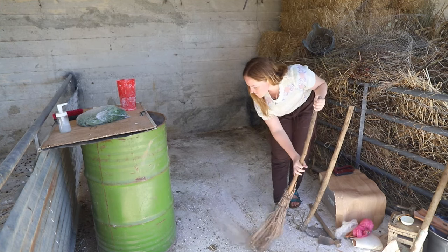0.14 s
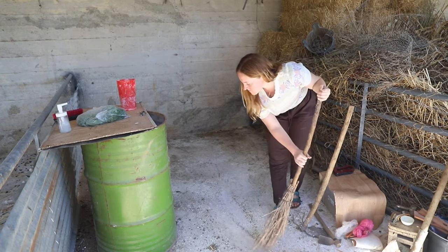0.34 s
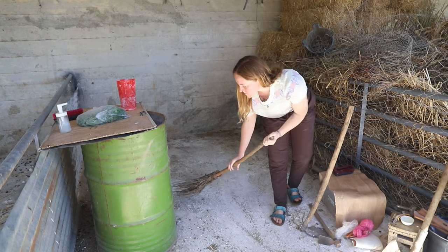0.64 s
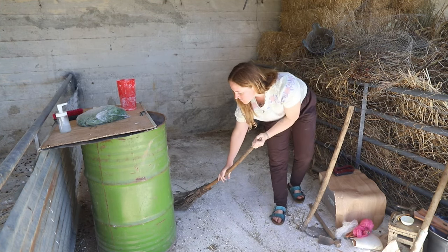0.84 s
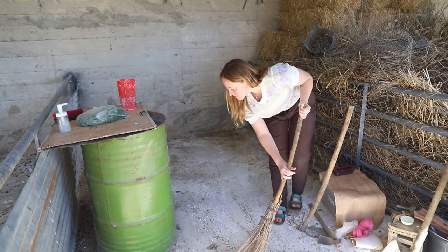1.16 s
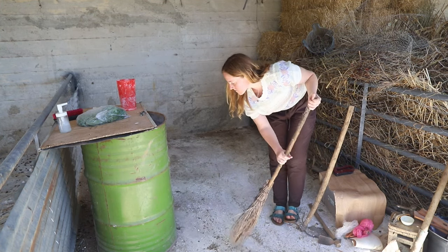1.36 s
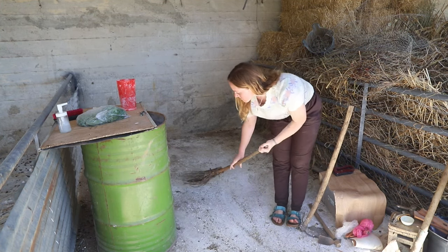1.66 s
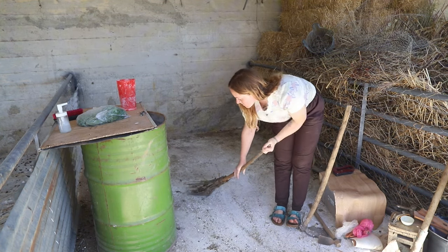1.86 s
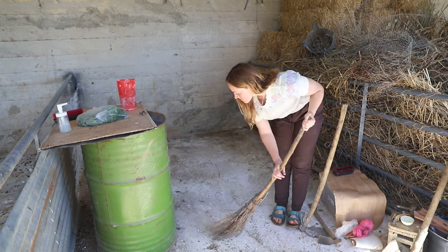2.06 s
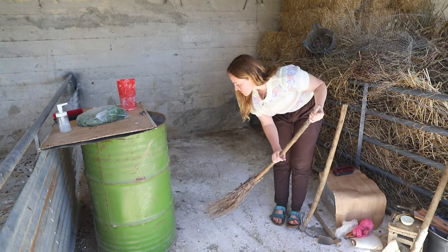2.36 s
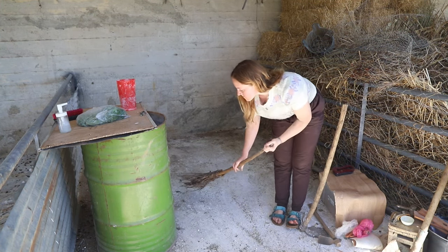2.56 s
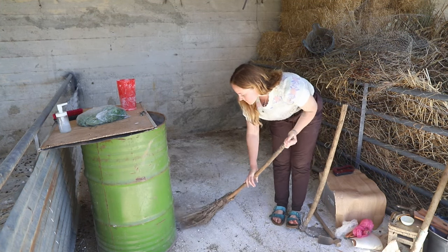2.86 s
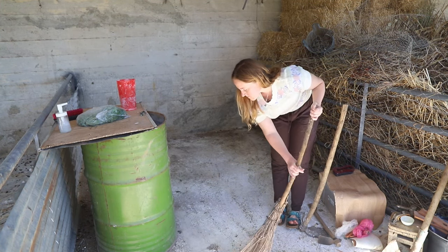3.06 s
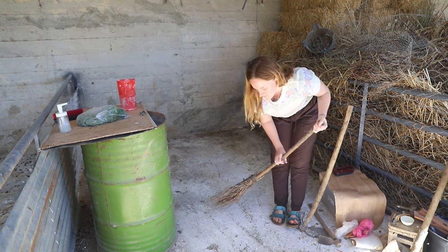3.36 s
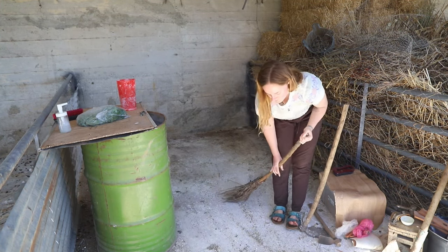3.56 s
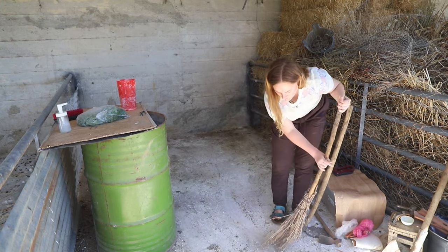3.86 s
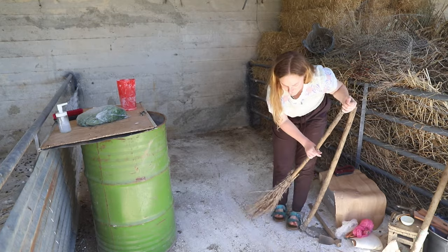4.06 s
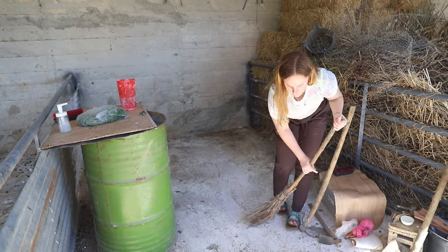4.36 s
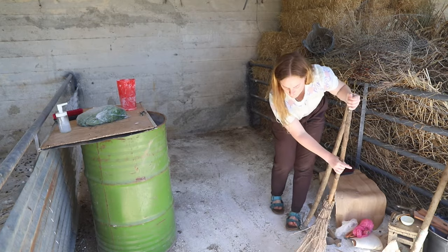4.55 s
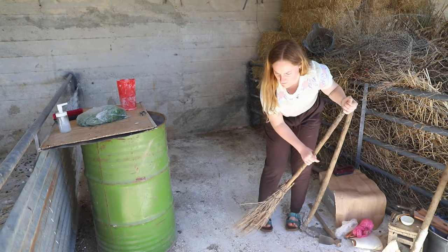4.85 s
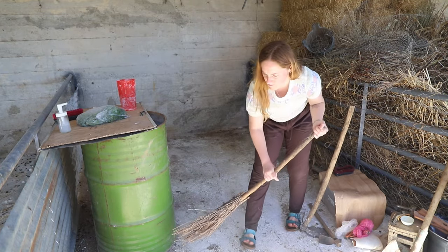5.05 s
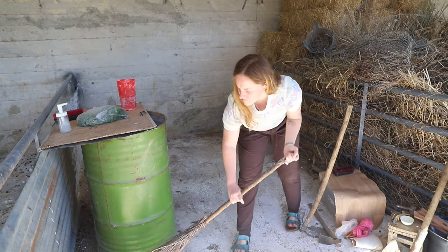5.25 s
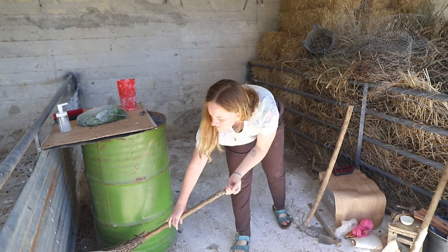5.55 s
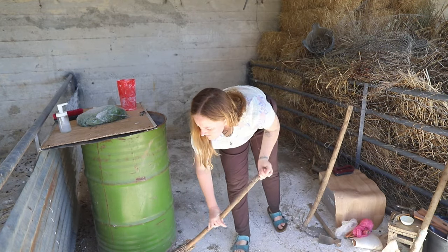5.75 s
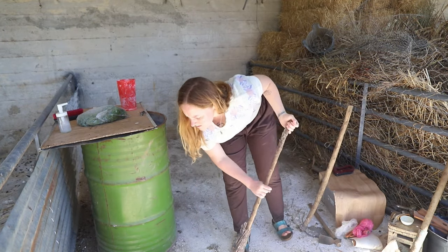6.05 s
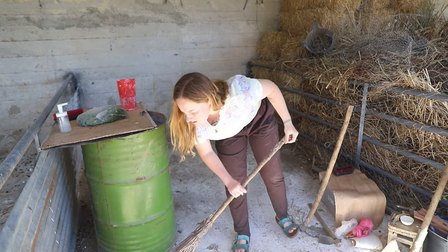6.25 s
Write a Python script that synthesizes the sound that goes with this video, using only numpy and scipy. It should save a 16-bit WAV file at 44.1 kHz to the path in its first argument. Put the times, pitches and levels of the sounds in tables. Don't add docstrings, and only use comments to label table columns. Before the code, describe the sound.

Dry, bristly broom strokes come in rhythmic bursts, close to a single microphone, with bright straw ticks and occasional scratchy squeaks. Wind flutters and rumbles underneath for over four seconds, then stops. In the quiet, grit ticks and a dull hollow knock lead to a sharp metallic slap on a drum, a short drag and two more strokes. Hard stable walls add a short reverberation; a soft knock ends it.

```python
import sys
import numpy as np
from scipy import signal
from scipy.fft import rfft, irfft, next_fast_len
from scipy.io import wavfile
from scipy.ndimage import uniform_filter1d, map_coordinates

SR = 44100
rng = np.random.default_rng(int(sys.argv[2]) if len(sys.argv) > 2 else 0)


def transcribe(signal):
    frames = np.atleast_2d(signal).T
    limited = np.clip(frames, -1, 1)
    pcm = np.round(limited * 32767).astype(np.int16)
    wavfile.write(sys.argv[1], SR, pcm)


def invert_db(level):
    return 10 ** (np.asarray(level, dtype=float) / 20)


N = 282222


def unit(x):
    return x / np.sqrt(np.mean(x ** 2) + 1e-20)


def noise():
    return rng.standard_normal(N)


def along(points, hz):
    point_hz, value = np.transpose(points)
    return np.interp(np.log(hz + 1), np.log(point_hz + 1), value)


def curves(rows):
    seconds, *columns = np.transpose(rows)
    return [np.interp(np.arange(N) / SR, seconds, column) for column in columns]


def wobble(rate):
    knots = rng.standard_normal(int(N * rate / SR) + 4)
    return map_coordinates(knots, [np.arange(N) * rate / SR])


def filtered(x, response):
    m = next_fast_len(N + SR // 2)
    return irfft(rfft(x, m) * response(np.fft.rfftfreq(m, 1 / SR)), m)[..., :N]


def coloured(x, spectrum):
    return unit(filtered(x, lambda hz: invert_db(along(spectrum, hz))))


def resonances(modes):
    def response(f):
        total = 0
        for k, (hz, width, db) in enumerate(modes):
            mode = 1j * f * width / (hz * hz - f * f + 1j * f * width)
            total = total + (-1) ** k * invert_db(db) * mode
        return total
    return response


def slips(spread_db, clump_db, clump_rate):
    size_db = spread_db * np.minimum(rng.exponential(size=N), 4)
    return unit(invert_db(size_db + clump_db * wobble(clump_rate)) * noise())


def patches(x, depth_db):
    z = signal.stft(x, nperseg=256)[2]

    def blur(bins, frames):
        across = uniform_filter1d(rng.standard_normal(z.shape), size=bins, axis=0)
        return unit(uniform_filter1d(across, size=frames, axis=1))

    field = blur(bins=4, frames=7) + 1.24 * blur(bins=8, frames=30)
    return unit(signal.istft(z * invert_db(depth_db * field), nperseg=256)[1][:N])


def flicks(rate, length):
    kicks = (rng.random(N) < rate / SR) * rng.exponential(size=N)
    return signal.lfilter([1], [1, -np.exp(-1 / (length * SR))], kicks)


# start in seconds, rise in seconds, hold in seconds,
# level of the tips in dB, lean in dB (+ onto the tips, - onto the stalks).
PUSHES = [(0.015, 0.018, .13, -37.5, 0), (0.189, 0.055, 0.062, -33, 2.5),
          (0.858, 0.038, 0.069, -45.5, -0.5), (0.979, .035, 0.19, -34.5, 0.5), (1.15, .06, 0.083, -37, 0.5),
          (1.866, 0.12, .05, -50, -1), (1.95, 0.066, 0.097, -39.5, 3.5), (2.02, .065, .17, -35.5, 1),
          (2.786, .006, 0.06, -49, -1), (2.86, 0.083, 0.036, -37.5, 0.5), (2.979, 0.061, 0.12, -37, 1),
          (3.553, 0.0076, 0.069, -55.5, 0), (3.59, 0.047, 0.056, -51.5, -5),
          (3.66, 0.083, 0.16, -38.5, -1.5), (3.82, 0.097, 0.053, -39, 0), (4.378, 0.029, 0.12, -41.5, -2),
          (4.44, 0.071, 0.067, -35, -0.5), (4.55, 0.046, 0.099, -39, 1.5), (5.639, 0.02, .02, -39.5, -8.5),
          (5.695, .015, 0.067, -46.5, -5), (5.78, 0.047, 0.056, -41.5, 0), (5.918, 0.056, 0.098, -37.5, 1)]
BRUSHES = [(-.01, .005, .02, -56, -4), (.655, .01, 0.07, -74, 7), (2.764, .004, .008, -64, -5),
           (.44, 0.015, 0.082, -62.5, 13), (1.53, .006, .03, -70, 8), (1.66, 0.061, .02, -68.5, -2.5),
           (1.78, 0.07, 0.036, -67, -1), (2.49, 0.016, 0.045, -69, 6), (4.27, 0.012, 0.015, -73, -5),
           (4.35, .006, .02, -64, 3), (5.0, 0.021, 0.055, -74, -4.5), (5.18, .006, .05, -60.5, -1.5),
           (5.232, 0.0046, .012, -64, -9), (5.25, 0.019, 0.045, -73, -8), (5.33, .02, .08, -66.5, -4),
           (5.44, 0.003, 0.052, -67, -4), (5.618, 0.0038, 0.049, -44, -6), (6.18, 0.016, 0.038, -72.5, -14),
           (6.296, .008, 0.04, -73, -11)]
# level against the tips in dB, dB per dB of lean,
# how fast it dies against the tips as a ratio.
PARTS = [
    (-4, 0.2, 1.1),
    (-0.3, -0.03, 0.88),
    (-4, -1.53, 0.9),
    (-12.5, -1.4, 0.92),
]


def strokes():
    rise_db, sag_db_per_s, lift_db_per_s = 10.5, 2.5, 212
    roll_db_per_s = 5.5
    settle_db, settle_db_per_s = -29, 64
    t = np.arange(0, N / SR + .002, .001)
    power = 1e-12
    over_db, per_lean, pace = np.transpose(PARTS)[..., None]
    for s, rise, hold, db, lean_db in PUSHES + BRUSHES:
        swell_db = -rise_db * np.clip(1 - (t - s) / rise, 0, 1)
        sag_db = -sag_db_per_s * np.clip(t - s - rise, 0, hold)
        leaning_db = lean_db + roll_db_per_s * np.clip(t - s, 0, rise + hold)
        level_db = db + swell_db + sag_db + over_db + per_lean * leaning_db
        after = pace * np.maximum(t - s - rise - hold, 0)
        lift = invert_db(-2 * lift_db_per_s * after)
        settling = invert_db(2 * (settle_db - settle_db_per_s * after))
        power = power + (t >= s) * (lift + settling) * invert_db(2 * level_db)
    return [np.interp(np.arange(N) / SR, t, np.sqrt(p)) for p in power]


# frequency in Hz, level in dB per Hz.
DUST = [(7000, -37), (10000, -7.5), (12000, 1.5), (14000, 4.5), (15500, 1), (17000, 4.5)]
TIPS = [(1760, -28.5), (3200, -3.5), (5420, 2), (6320, -0.5), (8160, 1.5), (10500, -6), (13600, -15),
        (22000, -120)]
STALKS = [(700, -39.5), (1400, -0.5), (2000, 1.5), (2650, 2), (3300, -1.5), (4500, -5.5), (7000, -31)]
HEAD = [(150, -27), (350, -10), (550, -4.5), (900, 0.5), (1300, 4.5), (2200, -21.5)]


def broom():
    on_dust, on_tips, on_stalks, on_head = strokes()
    catch_db = 0.21 * wobble(45) + 0.12 * wobble(160)
    fine = patches(slips(spread_db=1.0, clump_db=-0.85, clump_rate=340), depth_db=0.4)
    fine = fine * (1 + 0.22 * flicks(rate=64, length=0.0032))
    hiss = on_dust * coloured(fine, DUST) + on_tips * coloured(fine, TIPS)
    rasp = patches(slips(spread_db=3.5, clump_db=1.0, clump_rate=170), depth_db=1.45)
    rumble = slips(spread_db=2.5, clump_db=1.0, clump_rate=42)
    low = on_stalks * coloured(rasp, STALKS) + on_head * coloured(rumble, HEAD)
    return invert_db(catch_db) * (hiss + low)


# start in seconds, level in dB, pitch in Hz,
# width in Hz, t60 in seconds.
RUBS = [(0.032, -39.5, 2760, 510, 0.27), (1.29, -37.5, 2800, 700, 0.16), (1.665, -63, 2400, 820, .1),
        (1.995, -43.5, 1700, 700, .4), (2.76, -57, 7900, 1500, .09), (2.782, -45, 8100, 1600, .12),
        (3.153, -35, 2800, 1050, 0.14), (3.155, -38, 4570, 1700, 0.14), (3.685, -43.5, 1250, 330, 0.12),
        (4.405, -37, 2620, 900, 0.17), (6.16, -59, 2420, 240, 0.62)]
HUMS = [(.83, -58, 404, 32, 0.34), (2.92, -56, 561, 60, 1.24), (3.95, -64, 496, 30, 1.4),
        (4.0, -60.5, 350, 370, 1.4), (5.265, -51.5, 620, 710, 0.45), (6.305, -54, 520, 500, 0.44),
        (6.3, -56.5, 1400, 700, .4), (3.62, -61, 260, 190, 1.7), (5.249, -72, 79, 13, 1),
        (5.63, -56, 77, 70, 2.5), (5.63, -49, 150, 106, 1.94), (6.205, -53.5, 1275, 70, .2),
        (6.28, -60, 59.7, 56, .66)]


def rubs():
    out, t = np.zeros(N + SR), np.arange(SR) / SR
    for rows, rise in [(RUBS, 0.0096), (HUMS, 0.03)]:
        for s, db, hz, width_hz, t60 in rows:
            peak = signal.iirpeak(hz, hz / width_hz, SR)
            once = signal.lfilter(*peak, rng.standard_normal(len(t)))
            tone = unit(signal.lfilter(*peak, once))
            swell = np.sin(np.pi / 2 * np.minimum(t / rise, 1)) ** 2
            decay_db = -60 * np.maximum(t - rise, 0) / t60
            out[round(s * SR):][:len(t)] += swell * invert_db(db + decay_db) * tone
    return out[:N]


# mode in Hz, width in Hz, level in dB.
DRUM = [(191, 85, -10), (434, 280, -1.5), (870, 260, 1), (1200, 280, 1.5), (1720, 490, -0.5),
        (2460, 230, -0.5), (2800, 140, -1), (3570, 740, -14)]


def drum():
    slap_s, slap_db, rise_s, hold_s = 5.619, -27.5, 0.0023, 0.027
    straws = slips(spread_db=3.0, clump_db=-0.5, clump_rate=240)
    t = np.arange(N) / SR - slap_s
    after = np.maximum(t - hold_s, 0)
    rattle = invert_db(-173 * after)
    drag = invert_db(-9 - 39 * after)
    shape = np.clip(t / rise_s, 0, 1) ** 2 * np.maximum(rattle, drag)
    return invert_db(slap_db) * shape * unit(filtered(straws, resonances(DRUM)))


# start in seconds, peak in dB, pitch in Hz.
SNAPS = [(0.0188, -25.5, 9000), (.0237, -36, 8500), (0.0966, -32, 6860), (0.4536, -37, 11500),
         (0.5256, -41, 11900), (.846, -38, 8950), (.8632, -31.5, 7640), (0.8918, -31, 7670),
         (1.5316, -43.5, 11100), (1.701, -41, 8800), (1.8657, -45, 7820), (1.921, -36, 7460),
         (1.934, -34, 7600), (1.9633, -29, 8400), (2.52, -48, 8180), (2.5895, -48, 8500),
         (2.767, -42, 8140), (2.7884, -31.5, 8100), (2.799, -35, 7890), (2.907, -23.5, 9000),
         (3.514, -48.5, 6170), (3.556, -38, 8780), (3.5682, -36, 9040), (3.5945, -30.5, 8650),
         (3.6078, -32, 8040), (4.369, -45, 8150), (5.2214, -41, 5340), (5.696, -25, 10200),
         (5.8304, -27, 12400), (5.8447, -28, 9030)]
TICKS = [(1.6785, -46, 2420), (1.6898, -44, 1390), (1.733, -57, 1340), (5.1847, -47, 2130),
         (5.235, -40, 1210), (5.239, -30.5, 1620), (5.313, -36, 1490), (5.441, -46, 1840),
         (5.4447, -46, 1390), (5.655, -12.5, 1260), (6.301, -46, 1860)]


def grit():
    crackle_s = 0.0013
    out, t = np.zeros(N + SR), np.arange(1024) / SR
    for s, db, hz in SNAPS + TICKS:
        ring = np.sin(2 * np.pi * hz * t) * np.exp(-t * hz / 1.1)
        edge = ring[:64] - np.append(0, ring[:63]) * np.exp(-np.pi * hz / SR)
        edge = np.convolve(edge, np.hanning(3 + int(SR / hz / 3)))
        burst = rng.standard_normal(len(t)) * np.exp(-t / crackle_s)
        crackle = np.convolve(burst, edge)[:len(t)]
        out[round(s * SR):][:len(t)] += invert_db(db) * crackle / np.abs(crackle).max()
    return out[:N]


# start in seconds, peak in dB, contact in seconds.
KNOCKS = [
    (5.26, -29, 0.036),
    (5.343, -45, 0.015),
    (5.39, -52, 0.03),
    (5.631, -25, 0.025),
    (6.3, -29, 0.033),
    (6.355, -42, 0.037),
]
# mode in Hz, width in Hz, level in dB.
BOARD = [(150, 23, -14), (237, 20, -4.5), (290, 58, 3), (350, 28, -5.5), (429, 26, 3), (572, 34, -10),
         (700, 100, -1), (906, 65, -8.5), (1470, 100, -8)]


def sandal():
    out, t = np.zeros(N + SR), np.arange(SR // 4) / SR
    for s, db, contact in KNOCKS:
        ring = 0
        for hz, width, level in BOARD:
            strength = invert_db(level + rng.normal(0, 0.5))
            ring = ring + strength * np.exp(-.4 * np.pi * width * t) * np.sin(2 * np.pi * hz * t)
        scuff = 0.5 * uniform_filter1d(rng.standard_normal(len(t)), size=8)
        damped = invert_db(-60 * np.maximum(t - contact, 0) / 0.065)
        onset = 1 - np.exp(-t / 0.0013)
        out[round(s * SR):][:len(t)] += invert_db(db - 11.0) * (ring + scuff) * damped * onset
    return out[:N]


# frequency in Hz, t60 in seconds.
WALLS = [(200, 1), (1500, 0.49), (5000, 0.42), (14000, 0.095)]


def walls(x):
    hz, t, z = signal.stft(rng.standard_normal(SR // 2), SR, nperseg=256)
    decay = invert_db(-60 * t / along(WALLS, hz)[:, None])
    tail = signal.istft(z * decay, SR, nperseg=256)[1]
    delayed = np.pad(x, (300, 0))
    return signal.fftconvolve(delayed, tail / np.linalg.norm(tail))[:N]


# time in seconds, breeze in dB, flutter over the breeze in dB.
WIND = [(0, -45.5, -8), (.4, -43.5, -13), (.66, -59, -4.5), (.85, -44.5, -10.5), (1.2, -40.5, -8.5),
        (1.7, -43.5, -12), (2.0, -59.5, -6.5), (2.3, -48, -1.5), (2.6, -41, -3), (2.8, -48, 0.5),
        (2.9, -54, -10.5), (3.3, -45, -8.5), (3.55, -52, -13), (3.8, -50.5, -4), (4.28, -64, -8.5),
        (4.34, -76, -20), (4.5, -82, -3)]
# time in seconds, lift in dB, half length in seconds,
# lift of the flutter in dB.
EDDIES = [(0.044, 7.5, .025, -6), (0.086, -13, 0.022, -8), (0.19, 12.5, 0.038, 18.5), (0.303, 9, .025, 11),
          (.55, 5, .04, 4), (.75, 5.5, 0.035, 7.5), (0.853, 5.5, .03, 4), (1.031, 1, 0.017, 11),
          (1.101, 9.5, 0.017, 12), (1.22, 5, 0.022, 3), (1.397, -2, 0.022, 8), (1.46, 12, 0.029, 13),
          (1.575, 4, 0.038, 12), (1.693, 7.5, 0.045, 9.5), (1.845, 6, .03, 3), (2.113, 6, .04, 5),
          (2.423, 5.5, 0.053, 2), (2.665, 1.5, 0.059, 8), (2.83, -12, 0.026, -6), (3.155, 9.5, 0.1, 0),
          (3.294, -6, 0.017, 5), (3.713, 6.5, 0.043, 13.5), (4.084, 4.5, 0.044, 5), (4.3, 7, .025, -3)]
# frequency in Hz, level in dB per Hz.
BUFFET = [(8, -5.5), (25, 4.5), (50, 0), (80, -15), (150, -53)]
FLUTTER = [(40, -15.5), (80, 2), (130, -7), (220, -17), (400, -34.5), (800, -59)]


def wind():
    breeze_db, flutter_db = curves(WIND + [(4.7, -94, 11.6)])
    t = np.arange(N) / SR
    eddy_db = 0
    for s, lift_db, half, flutter_lift_db in EDDIES:
        passing = np.exp(-((t - s) / half) ** 2)
        eddy_db = eddy_db + lift_db * passing
        flutter_db = flutter_db + flutter_lift_db * passing
    lumps_db = 2.0 * wobble(20)
    slow = unit(invert_db(lumps_db) * coloured(noise(), BUFFET))
    fast = unit(invert_db(0.37 * lumps_db + 2.6 * wobble(40)) * coloured(noise(), FLUTTER))
    return invert_db(breeze_db) * (invert_db(eddy_db) * slow + invert_db(flutter_db) * fast)


# frequency in Hz, level in dB per Hz.
AIR = [(15, -61), (25, -30), (313, -8.5), (367, -9), (481, -9), (823, -11), (892, -12.5), (3910, -23.5),
       (5400, -21), (15400, -33.5)]


def air():
    return invert_db(-64.5 + .5 * wobble(3)) * coloured(noise(), AIR)


def scene():
    sweep = broom() + rubs()
    hits, knocks = grit() + drum(), sandal()
    to_walls = invert_db(-15.0) * sweep + invert_db(-8.0) * hits + invert_db(-22) * knocks
    mono = sweep + hits + knocks + walls(to_walls) + wind() + air()
    return np.array([mono, mono])


def band_limit(x):
    return signal.sosfilt(signal.butter(12, 16500, fs=SR, output="sos"), x)


# resonance in Hz, width in Hz, level added in dB.
PORT = (8530, 960, -15.5)


def record(dry):
    top_hz = 15830
    port = resonances([PORT])
    mix = filtered(dry, lambda hz: (1 + port(hz)) * (hz < top_hz))
    return band_limit(mix)


dry = scene()
out = record(dry)
transcribe(out)
```